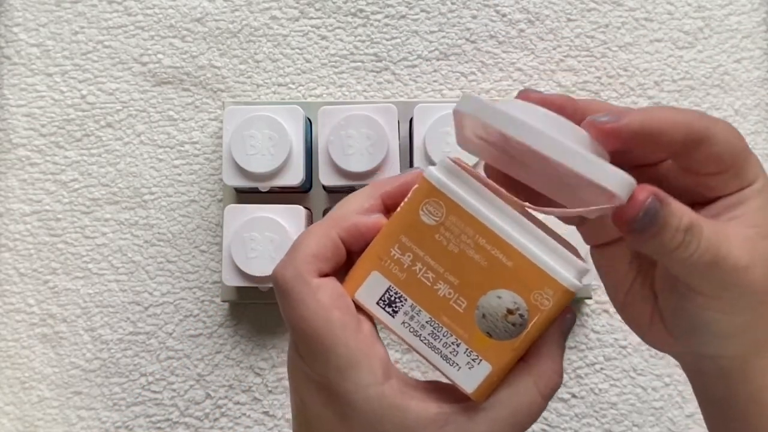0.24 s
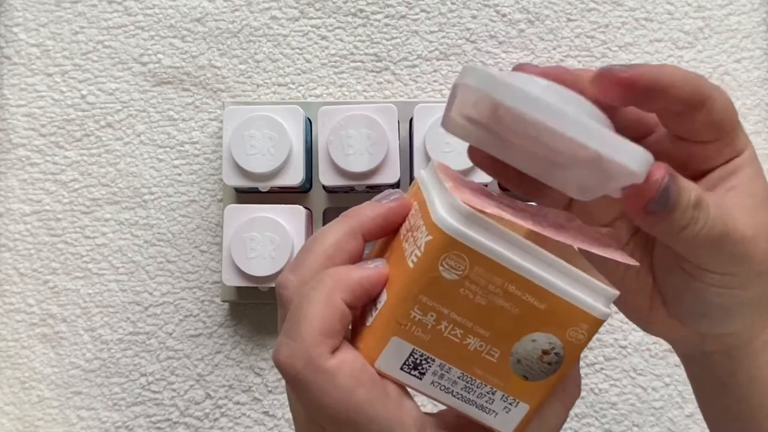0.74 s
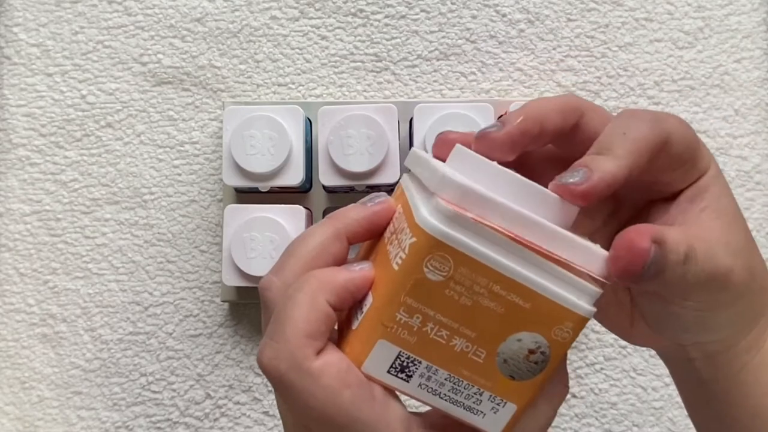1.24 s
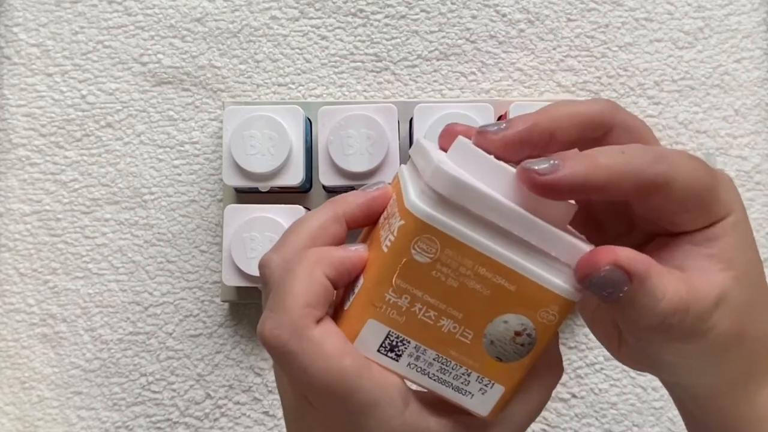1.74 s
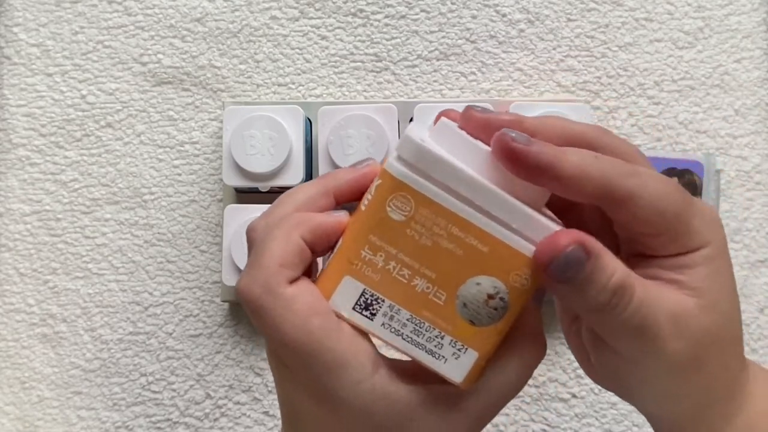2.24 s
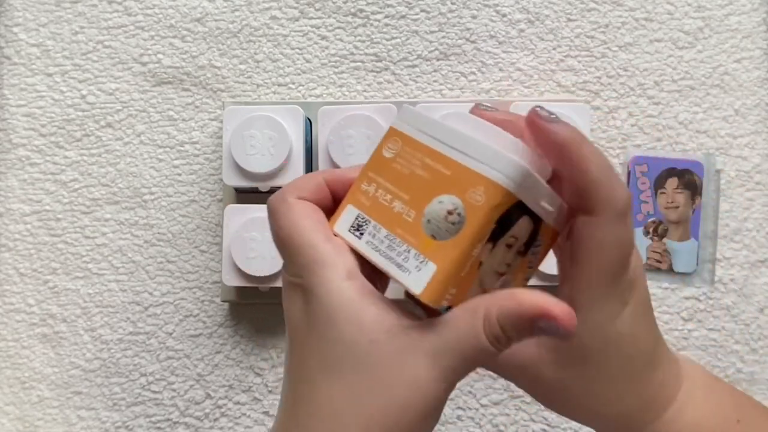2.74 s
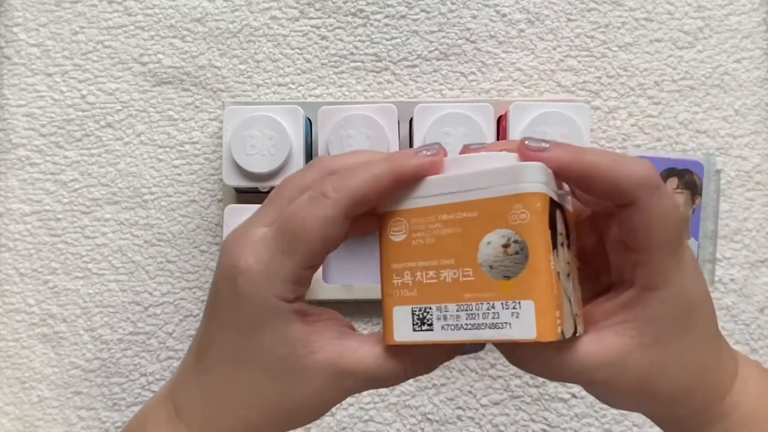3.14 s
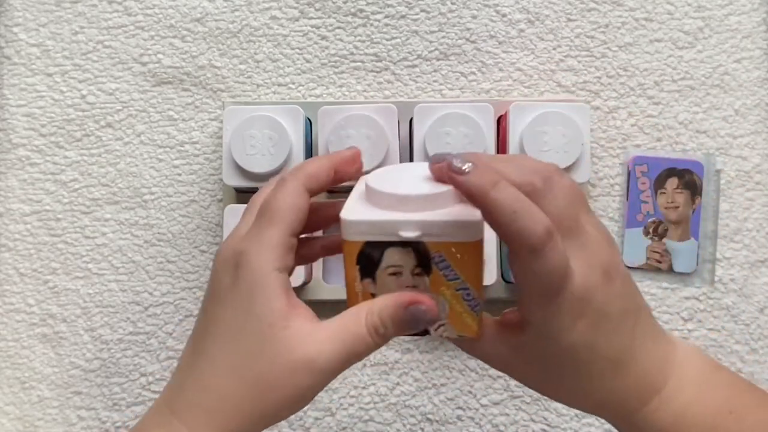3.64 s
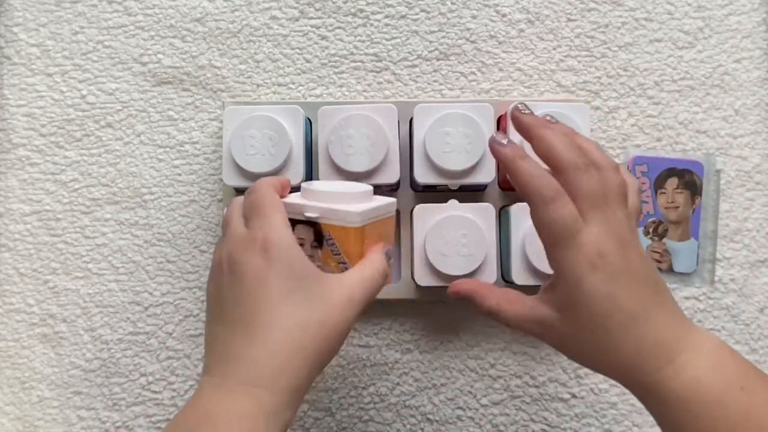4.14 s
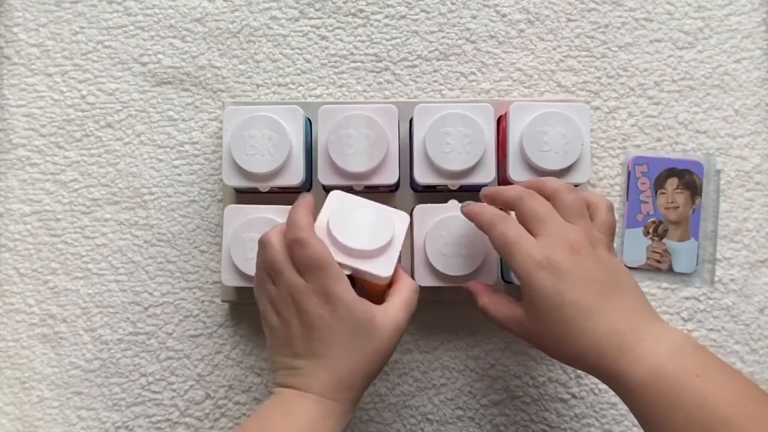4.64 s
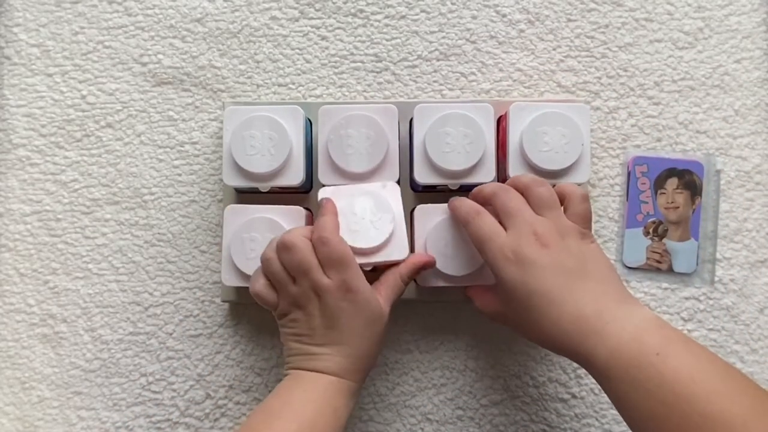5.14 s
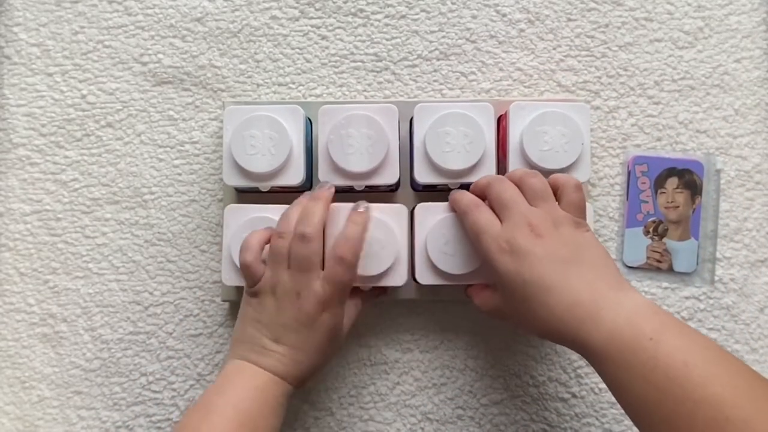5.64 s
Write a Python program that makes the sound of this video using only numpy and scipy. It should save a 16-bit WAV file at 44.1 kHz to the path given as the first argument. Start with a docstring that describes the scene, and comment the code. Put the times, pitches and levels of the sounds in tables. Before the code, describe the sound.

A small, quiet furnished room with soft air noise and a faint, slightly wavering low hum throughout, heard by a phone close above. Faint finger rubs begin, then a light cluster of plastic clicks around 0.4 s as the lid lifts. A firmer click comes at 0.9, another at 1.3, a strong crisp one at 1.9, smaller ones at 2.1, and a bright hard snap at 2.4 with a small low bump as the lid closes. Turning the tub is nearly silent: faint skin rubs and a tiny slowing creak of ticks ending near 3.2. At 4.4 a light double knock, then from 4.9 little taps, a tiny squeak and soft low drags as the tub works in between its neighbours, with a firmer knock at 5.3. The loudest event is a hollow, low thump at about 5.66 as it drops home, followed by a faint tap. Short dry decays.

```python
"""Fingers rub on plastic over a soft hum and room air that last throughout: hands lift the lid off a small
tub, press it back until it snaps shut, turn the tub round and set it down among other tubs in a tray.
Contacts ring damped modes of the thin walls and hollow body under a brief crack; sliding is uneven noise
through resonances, and a creak is a slowing run of ticks. A small quiet room, on a phone just above."""
import sys
import numpy as np
from scipy import signal
from scipy.fft import rfft, irfft
from scipy.io import wavfile

SR = 44100
rng = np.random.default_rng(int(sys.argv[2]) if len(sys.argv) > 2 else 0)


def wrap_up_sound(samples):
    """Save the sound to the file named by the first command line argument, as 16-bit audio."""
    columns = np.atleast_2d(samples).T
    # keep every value between -1 and 1, then stretch to whole-number steps
    tamed = np.clip(columns, -1, 1)
    steps = np.round(tamed * 32767).astype(np.int16)
    wavfile.write(sys.argv[1], SR, steps)


N = 259547
T = np.arange(N) / SR
RING_T = T[:SR // 4]  # time axis of one contact

# skin and plastic sliding on the walls: start_s, end_s, level_db, centre_hz, width_octaves
RUBS = [(0.064, 0.097, -62, 1390, 0.16), (0.231, 0.301, -61.5, 2520, 0.26), (0.336, 0.377, -68, 2600, 0.46),
        (0.952, 1.14, -69, 3280, 0.57), (1.017, 1.133, -60.5, 1530, 0.13), (1.209, 1.26, -70.5, 1630, 0.38),
        (1.996, 2.033, -64, 1450, 0.57), (2.235, 2.276, -55, 3330, 0.37), (2.611, 2.785, -75.5, 4280, 0.17),
        (2.84, 2.955, -70, 4140, .26), (3.3, 3.532, -82, 4180, 0.33), (3.549, 3.604, -78, 4700, 0.26),
        (3.707, 3.829, -73.5, 4780, 0.13), (3.914, 3.992, -68.5, 4330, .18),
        (4.795, 5.028, -71, 2580, 0.51), (5.037, 5.358, -66.5, 2430, 0.46),
        (5.564, 5.629, -54.5, 2430, 0.14), (5.623, 5.672, -51.5, 2320, 0.51)]
# the lid catching on the rim or under a fingernail: start_s, wall_db, wall_centre_hz, body_db, crack_db
LID_CLICKS = [(0.3908, -59, 2260, -73, -58.5), (0.4196, -37, 2330, -45, -66),
              (0.428, -42.5, 2560, -46, -58), (0.459, -45, 2680, -59, -46.5),
              (0.4646, -51, 2960, -51.5, -54), (0.8935, -63.5, 2600, -63, -76),
              (0.9359, -27, 3020, -41.5, -40.5), (1.2662, -34.5, 1530, -44.5, -50),
              (1.2907, -49, 1390, -45.5, -50.5), (1.545, -68, 1120, -64, -65.5),
              (1.5721, -62, 1210, -68, -69), (1.902, -37, 1800, -44, -36.5),
              (1.908, -27.5, 1780, -47, -30.5), (2.1086, -47.5, 1750, -54, -46.5),
              (2.11, -37, 1370, -43.5, -55), (2.3347, -48, 1200, -49.5, -59),
              (2.3733, -42, 2940, -47.5, -58.5), (2.4079, -25, 4570, -36, -25.5),
              (2.4082, -27, 1120, -51.5, -49.5), (2.4398, -41.5, 3270, -39.5, -30),
              (3.0857, -62, 5600, -61.5, -67), (3.1042, -55, 6300, -61, -62),
              (3.3475, -61, 3110, -67.5, -59.5), (3.9288, -55, 4100, -70, -69)]


def undb(db):
    """Decibels to gain."""
    return 10 ** (np.asarray(db) / 20)


def level(x, db):
    """Set the rms level."""
    return x * undb(db) / np.sqrt(np.mean(x ** 2))


def burst(x, db):
    """Set the energy of a short stereo sound, as a level over 10 ms."""
    return x * undb(db) / np.sqrt(np.sum(x ** 2) / (2 * SR / 100))


def add(out, s, x):
    """Mix x in at time s."""
    i = max(int(s * SR), 0)
    out[..., i:i + x.shape[-1]] += x[..., :max(N - i, 0)]


def colour(x, gain):
    """Filter by a gain that is a function of frequency."""
    size = x.shape[-1]
    hz = np.fft.rfftfreq(size, 1 / SR) + 1  # one hertz up, to keep clear of zero
    return irfft(rfft(x) * gain(hz), size)


def hump(hz, centre_hz, octaves):
    """A broad resonance on a log-frequency axis."""
    return 1 / (1 + (np.log2(hz / centre_hz) / octaves) ** 2 / 2)


def noise(size, apart):
    """Stereo noise; apart is the weight of what differs between the sides."""
    mid, side = rng.standard_normal((2, size))
    return np.array([mid + apart * side, mid - apart * side])


def diffuse(size, split_hz):
    """Noise from all around: the same on both sides in the bass, unrelated well above split_hz."""
    mid, side = rng.standard_normal((2, size))
    side = colour(side, lambda hz: 1 / np.sqrt(1 + (split_hz / hz) ** 3))
    return np.array([mid + side, mid - side])


def background():
    """A slightly wavering appliance hum over soft room air."""
    # spectrum of the room air: pitch_hz, relative_level_db (per Hz)
    air_curve = [(15, -46), (25, -36.5), (48, -7), (134, -15.5), (242, -11.5), (293, -18.5), (405, -17),
                 (439, -24), (503, -20), (560, -26), (840, -25.5), (1480, -38.5), (2550, -43),
                 (5430, -57.5), (16000, -65)]
    # partials of the room hum: pitch_hz, level_db
    hum_lines = [(59.2, -56), (177.6, -64.5), (236.9, -65), (409.1, -73)]
    hz, db = np.transpose(air_curve)
    air = colour(diffuse(N, split_hz=510), lambda f: undb(np.interp(np.log(f), np.log(hz), db)))
    knots = np.linspace(0, T[-1], num=40)
    hum = 0
    for line_hz, line_db in hum_lines:
        swell, drift = (np.interp(T, knots, row) for row in rng.standard_normal((2, len(knots))))
        tone = np.sin(2 * np.pi * line_hz * T + 1.4 * drift)
        hum = hum + level(undb(0.69 * swell) * tone, line_db)
    return level(air, -56) + hum


def wall_slides():
    """Fingers on the walls: the higher a rub sits, the more hiss comes with it."""
    mid_hz, mid_hiss_db, hiss_db_per_octave = 2600, -12, 4
    return [(start, end, db, hz, octaves, mid_hiss_db + hiss_db_per_octave * np.log2(hz / mid_hz))
            for start, end, db, hz, octaves in RUBS]


def rim_scrapes():
    """The rim slides around each catch of the lid, at a level that follows the click's walls."""
    before_s, after_s = 0.015, 0.023
    scrape_db, octaves, hiss_db = -28.5, 0.63, -10  # scrape relative to the click, hiss to the scrape
    return [(s - before_s, s + after_s, wall_db + scrape_db, hz, octaves, hiss_db)
            for s, wall_db, hz, _, _ in LID_CLICKS]


def base_drags():
    """The base of the tub drags on the tray, through one low resonance with hardly any hiss."""
    # the base sliding: start_s, end_s, level_db
    drag_spans = [(5.156, 5.185, -57), (5.274, 5.323, -48), (5.55, 5.634, -52)]
    centre_hz, octaves, hiss_db = 624, 0.19, -31
    return [(start, end, db, centre_hz, octaves, hiss_db) for start, end, db in drag_spans]


def rubs(grain_db, hiss_hz):
    """Sliding contact: a dense run of uneven slips through one resonance, with a fine hiss above."""
    out = np.zeros((2, N))
    for start, end, db, centre_hz, octaves, hiss_db in wall_slides() + rim_scrapes() + base_drags():
        size = max(int((end - start) * SR), 256)
        grip = np.repeat(rng.standard_normal(size // 64 + 1), 64)[:size]  # a new grip every 64 samples
        slips = noise(size, 0.18) * undb(grain_db * grip) * signal.windows.tukey(size, 0.5)
        resonance = colour(slips, lambda hz: hump(hz, centre_hz, octaves))
        hiss = colour(slips, lambda hz: hump(hz, hiss_hz, 0.5))
        add(out, start, level(resonance, db))
        add(out, start, level(hiss, db + hiss_db))
    return out


def ring(modes, centre_hz, octaves, scatter_db, detune, apart):
    """Damped modes after one blow, favoured near a centre, with random shifts of strength, pitch and side."""
    hz, db, t60 = np.transpose(modes)[:, :, None]
    size, tune, turn = rng.standard_normal((3, len(modes), 1))
    decay = hump(hz, centre_hz, octaves) * undb(db + scatter_db * size - 60 * RING_T / t60)
    phase = 2 * np.pi * hz * (1 + detune * tune) * RING_T
    spread = apart * turn * np.minimum(hz / 600, 1)  # long waves reach both microphones more alike
    return np.array([np.sum(decay * np.sin(phase + side * spread), axis=0) for side in (1, -1)])


def wall_ring(modes, centre_hz, octaves, dense_db, dense_s):
    """Wall modes near the centre, over a short wash of crowded modes."""
    lines = ring(modes, centre_hz, octaves, scatter_db=1.5, detune=0.02, apart=0.35)

    def wash_gain(hz):
        return hump(hz, centre_hz, octaves) / (1 + (600 / hz) ** 3) / (1 + (hz / 6000) ** 4)

    wash = colour(noise(len(RING_T), 0.86), wash_gain) * np.exp(-RING_T / dense_s)
    spreading = 1 - np.exp(-RING_T / 0.00034)  # bending waves take a moment to cross the wall
    return burst(lines * spreading, 0) + burst(wash * spreading, dense_db)


def crack(decay_s, centre_hz):
    """The hard edge of a contact: about a millisecond of treble."""
    hiss = colour(noise(len(RING_T), 0.4),
                  lambda hz: hump(hz, centre_hz, 1.0) / (1 + (4000 / hz) ** 6))
    return hiss * np.exp(-RING_T / decay_s) * (1 - np.exp(-RING_T / 0.00075))


def strikes(events, body_modes, wall_modes, octaves, dense_db, dense_s, crack_s, crack_hz, pan_db):
    """Each contact cracks, rings the walls and sounds the hollow body; pan_db is left minus right."""
    # where the body rings most, higher as the lid closes and as the tub sinks into the tray: time_s, centre_hz
    body_centre = [(0.9, 380), (2.4, 517), (3.0, 365), (4.93, 359), (5.17, 530)]
    pan = undb(np.array([[pan_db], [-pan_db]]) / 2)
    out = np.zeros((2, N))
    for s, wall_db, wall_hz, body_db, crack_db in events:
        body_hz = np.interp(s, *np.transpose(body_centre))
        body = ring(body_modes, body_hz, octaves=0.45, scatter_db=1, detune=0.008, apart=0.4)
        walls = wall_ring(wall_modes, wall_hz, octaves, dense_db, dense_s)
        edge = crack(crack_s, crack_hz)
        add(out, s, burst(body, body_db) + burst(edge, crack_db) + burst(walls, wall_db) * pan)
    return out


def finger_touches():
    """A fingertip ticks as it takes hold, just after its rub begins, at levels that follow the rub."""
    delay_s, wall_db, body_db, crack_db = 0.01, 0.5, -2.5, -9.5
    return [(start + delay_s, db + wall_db, hz, db + body_db, db + crack_db)
            for start, _, db, hz, _ in RUBS]


def early_copies():
    """A faint copy of each click, at a random moment 1 to 4.4 ms earlier."""
    copy_db = -16  # relative to the click
    leads_s = rng.uniform(0.001, 0.0044, len(LID_CLICKS))
    return [(s - lead, wall_db + copy_db, hz, body_db + copy_db, crack_db + copy_db)
            for lead, (s, wall_db, hz, body_db, crack_db) in zip(leads_s, LID_CLICKS)]


def lid_contacts():
    """Fingertip ticks, lid clicks and their faint copies ring the thin walls and the tub held in the hand."""
    # thin walls of tub and lid: pitch_hz, relative_level_db, t60_s
    lid_walls = [(914, -7, 0.019), (1031, -1.5, 0.025), (1180, -7, 0.014), (1340, 5.5, 0.014),
                 (1580, -8, 0.025), (1849, -1, 0.022), (2180, -8, .015), (2330, 0, 0.012),
                 (2550, 0.5, 0.0047), (2735, 0, 0.01), (3466, 3.5, 0.011), (3730, -1, 0.0052),
                 (4100, -2.5, 0.015), (4570, 1, 0.0098), (5290, 6.5, 0.0054), (5700, 0.5, 0.0032)]
    # hollow tub held in the hand: pitch_hz, relative_level_db, t60_s
    held_tub = [(245, -9, 0.013), (372, 5, 0.027), (521, 1, 0.033), (669, 8, 0.028)]
    return strikes(LID_CLICKS + early_copies() + finger_touches(), held_tub, lid_walls, octaves=0.7,
                   dense_db=-3, dense_s=0.0015, crack_s=0.0012, crack_hz=6400, pan_db=-2)


def thuds():
    """The mass of the whole tub, being stopped, swings a few times against hand or tray."""
    # weight coming to a stop: start_s, level_db, pitch_hz, t60_s
    weight_stops = [(2.411, -51, 232, 0.089), (2.434, -34.5, 170.4, 0.058), (4.434, -39.5, 272, 0.037),
                    (4.452, -42.5, 112, 0.17), (5.331, -27.5, 460, 0.021), (5.664, -22.5, 142, 0.1),
                    (5.69, -28.5, 98, 0.1)]
    out = np.zeros((2, N))
    for s, db, hz, t60 in weight_stops:
        swing = np.sin(2 * np.pi * hz * RING_T) * np.exp(-np.log(1000) * RING_T / t60)
        add(out, s, burst(np.array([swing, swing]), db))
    return out


def squeak(overtone_db):
    """Very fast, uneven slips of skin or plastic on plastic; their period follows the slide's speed."""
    # brief squeaks: start_s, end_s, first_hz, last_hz, level_db
    squeak_spans = [(2.659, 2.691, 4320, 4310, -68), (5.053, 5.1, 5200, 2150, -60.5)]
    out = np.zeros((2, N))
    for start, end, first_hz, last_hz, db in squeak_spans:
        size = int((end - start) * SR)
        grip = signal.resample(rng.standard_normal(16), size)
        period_s = np.linspace(1 / first_hz, 1 / last_hz, size)
        phase = 2 * np.pi * np.cumsum((1 + 0.054 * grip) / period_s) / SR
        tone = np.sin(phase) + undb(overtone_db) * np.sin(2 * phase)
        swell = undb(3 * grip) * signal.windows.tukey(size, 0.7)
        add(out, start, level(tone * swell, db))
    return out


def creak(centre_hz, octaves, upper_hz, upper_db, crack_db, count):
    """Stick and slip of a fingertip: a slowing run of sharp ticks through two resonances of the lid."""
    end_s, quick_gap_s, jitter_s = 3.2216, 0.0022, 0.0003
    last_wait_s, wait_shrink = 0.0179, 0.62  # going back from the last slip, each wait is this share
    last_db, db_per_doubling = -45.5, 1.9  # longer gaps slip louder
    gaps = quick_gap_s + last_wait_s * wait_shrink ** np.arange(count)  # last gap first
    times = end_s - np.cumsum(gaps) + gaps + jitter_s * rng.standard_normal(count)
    damping = np.exp(-RING_T / 0.0033)  # the fingertip soon stops the wall

    def wall_gain(hz):
        return hump(hz, centre_hz, octaves) + undb(upper_db) * hump(hz, upper_hz, 0.055)

    out = np.zeros((2, N))
    for slip_s, gap in zip(times, gaps):
        wall = colour(noise(len(RING_T), 0.32), wall_gain) * damping
        tick = burst(wall, 0) + burst(crack(0.00027, 3600), crack_db)
        add(out, slip_s, tick * undb(last_db + db_per_doubling * np.log2(gap / gaps[0])))
    return out


def tray_contacts():
    """The tub knocks against the tray and its neighbours, ringing packed walls and a body on the tray."""
    # knocks: start_s, wall_db, wall_centre_hz, body_db, crack_db
    knocks = [(4.4323, -38, 1430, -44, -43), (4.4495, -43, 3470, -41.5, -44),
              (4.5148, -51, 3160, -43.5, -64), (4.927, -46.5, 1560, -43.5, -64),
              (4.941, -53.5, 1800, -58, -63), (5.0867, -48.5, 1510, -50, -58),
              (5.138, -53.5, 1590, -50.5, -59), (5.19, -51, 2270, -42, -62), (5.2218, -47, 2460, -67, -56),
              (5.2905, -43.5, 1850, -49, -59), (5.315, -45, 1870, -49, -54), (5.33, -38, 1530, -35, -59),
              (5.3825, -39.5, 1850, -46, -55.5), (5.561, -48.5, 1830, -54, -81),
              (5.58, -45.5, 2160, -45, -72), (5.6618, -23, 1250, -21.5, -69),
              (5.6692, -35, 1110, -18.5, -72), (5.783, -51.5, 1100, -45.5, -63)]
    # tub touching the tray: pitch_hz, relative_level_db, t60_s
    tray_body = [(236, -26, 0.16), (364.4, 2, 0.11), (448, 3, 0.093), (515, -0.5, 0.059),
                 (546.5, 4.5, 0.055), (605, 7.5, 0.039), (756, -7, 0.045)]
    # walls pressed against neighbouring tubs: pitch_hz, relative_level_db, t60_s
    packed_walls = [(842, 4, 0.021), (985, 0.5, 0.03), (1150, 3, 0.011), (1282, -3, 0.023),
                    (1478, -4, 0.028), (1530, -6, 0.026), (1803, 2.5, 0.016), (1937, -2.5, 0.022),
                    (2434, -12, 0.035), (2526, 2.5, 0.014), (3160, 5.5, 0.0096), (3650, -1, 0.0089)]
    return strikes(knocks, tray_body, packed_walls, octaves=0.74,
                   dense_db=-4.0, dense_s=0.014, crack_s=0.0015, crack_hz=6380, pan_db=-1)


def radiate(x):
    """What so small a tub passes on to the air: little deep bass."""
    return signal.sosfilt(signal.butter(2, 87, "high", fs=SR, output="sos"), x)


def room(x, echo_s, echo_db, bands):
    """An early bounce off a near surface and a furnished room's tail; bands: centre_hz, level_db, t60_s."""
    t = T[:SR // 2]
    response = np.zeros((2, len(t)))
    for centre_hz, db, t60 in bands:
        wash = colour(diffuse(len(t), split_hz=500), lambda hz: hump(hz, centre_hz, 1.0) ** 2)
        fade = (1 - np.exp(-t / 0.003)) * np.exp(-np.log(1000) * t / t60)
        response += undb(db) * wash * fade / np.sqrt(np.sum(fade ** 2))
    add(response, echo_s, np.full((2, 1), undb(echo_db)))
    return x + signal.fftconvolve(x, response, axes=1)[:, :N]


def scene():
    """All the handling sounds in the room; they reach the left microphone a little sooner."""
    friction = rubs(grain_db=4.5, hiss_hz=11200) + squeak(overtone_db=-13)
    friction += creak(centre_hz=1840, octaves=0.3, upper_hz=5200, upper_db=-7, crack_db=-4, count=18)
    handling = friction + lid_contacts() + thuds() + tray_contacts()
    left, right = room(radiate(handling), echo_s=0.005, echo_db=-20,
                       bands=[(460, -10, 0.23), (1370, -14.5, 0.27), (3680, -12.5, 0.21), (11600, -16.5, 0.15)])
    lag_s = 2.6e-5
    late_right = colour(right, lambda hz: np.exp(-2j * np.pi * hz * lag_s))
    return np.array([left, late_right]) + background()


def record(dry):
    """The microphones dent the treble; the deepest bass and the top are cut off."""
    # dips in the treble of the microphones: centre_hz, width_hz, depth_db
    mic_dips = [(7357, 840, -13.5), (13500, 1100, -14.5), (15800, 900, -1.5)]

    def response(f):
        dents_db = sum(db * np.exp(-((f - hz) / width) ** 2) for hz, width, db in mic_dips)
        return undb(dents_db) / (1 + (36 / f) ** 6)

    top_cut = signal.ellip(10, 0.2, 80, 16200, fs=SR, output="sos")
    return signal.sosfilt(top_cut, colour(dry, response))


dry = scene()
out = record(dry)
wrap_up_sound(out)
```